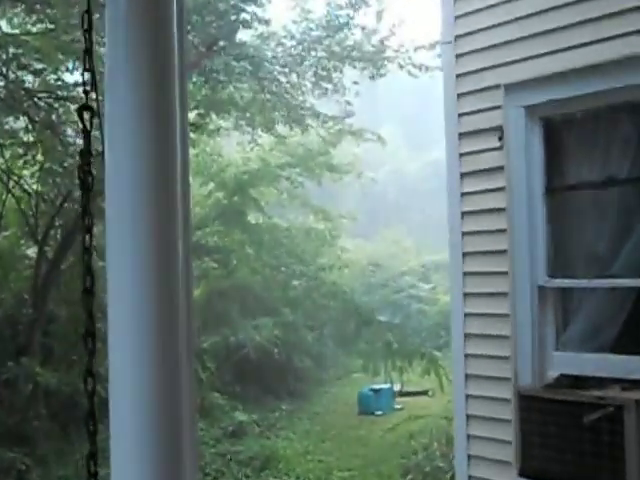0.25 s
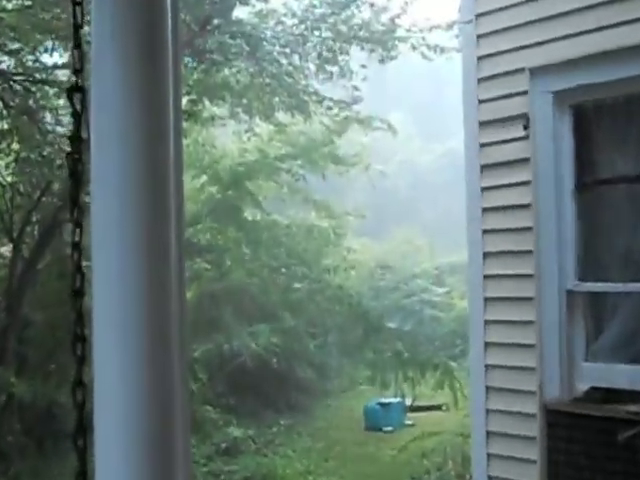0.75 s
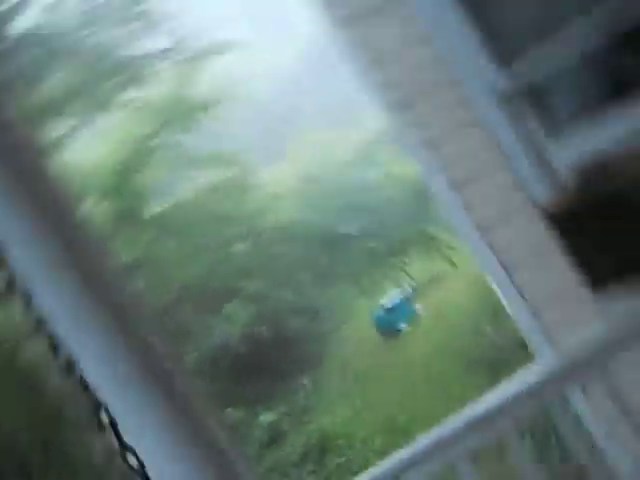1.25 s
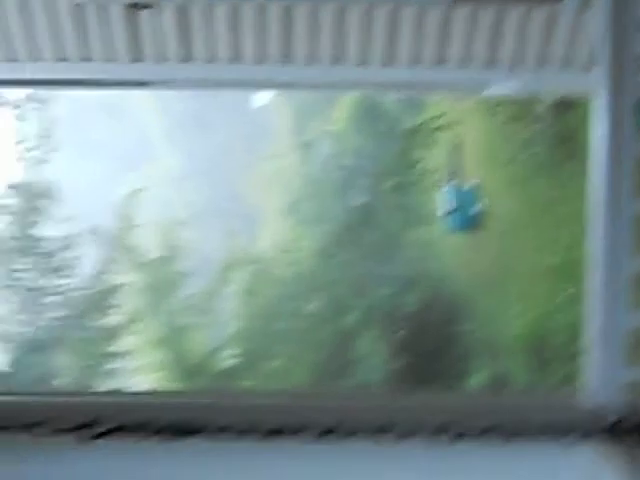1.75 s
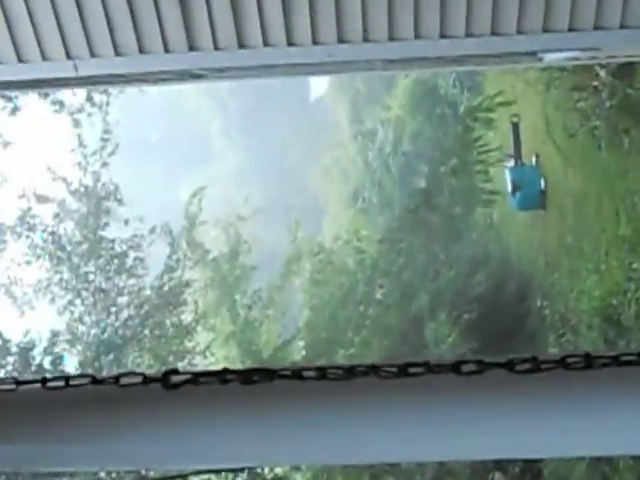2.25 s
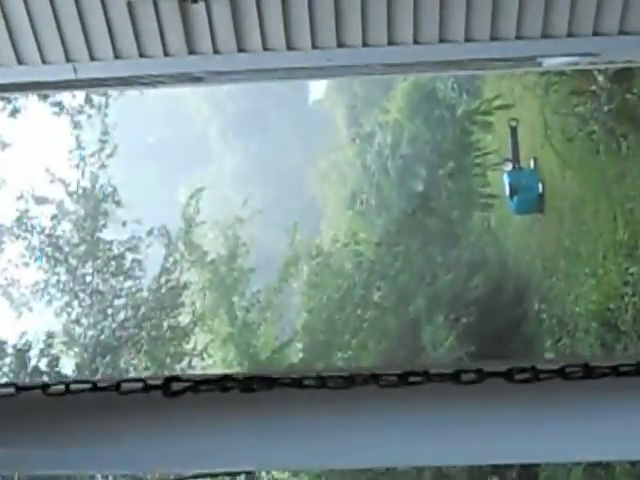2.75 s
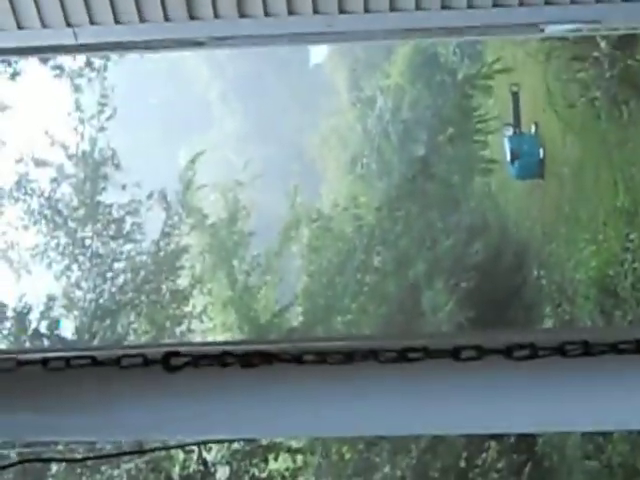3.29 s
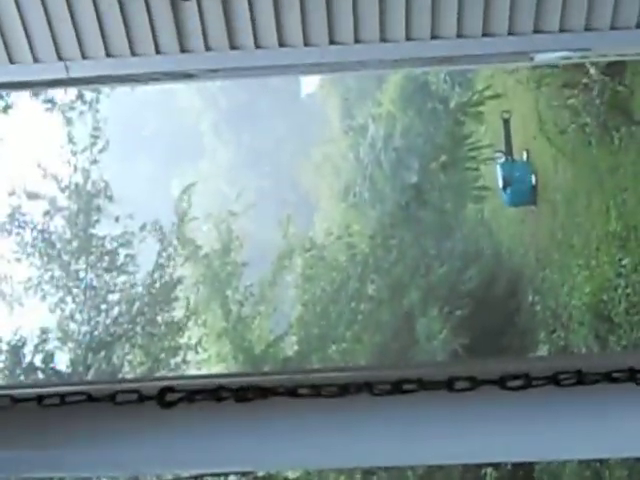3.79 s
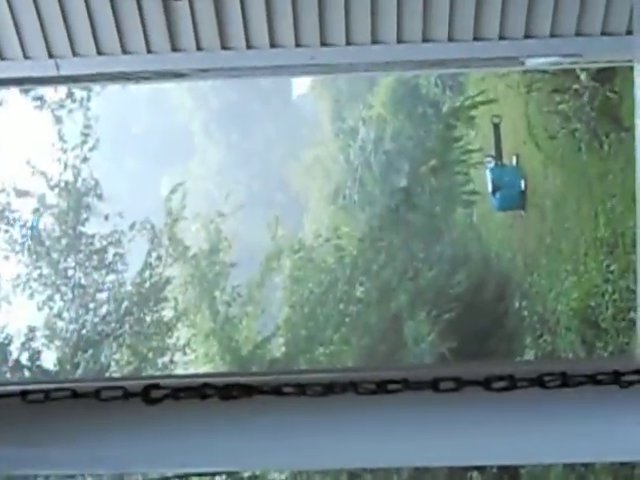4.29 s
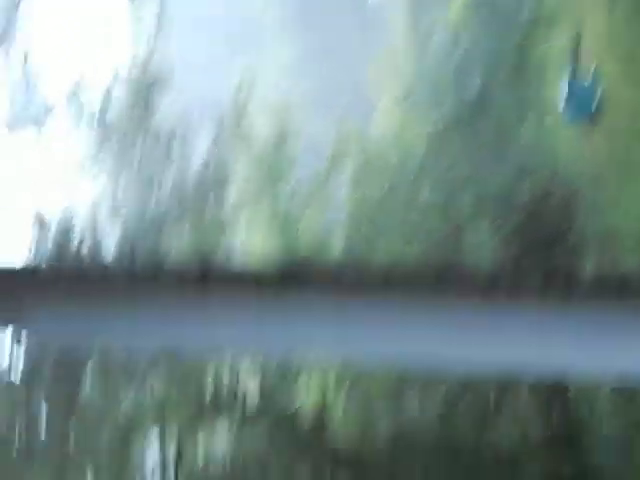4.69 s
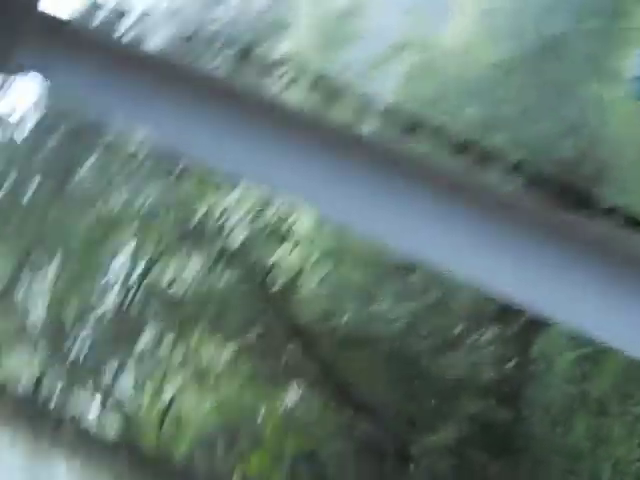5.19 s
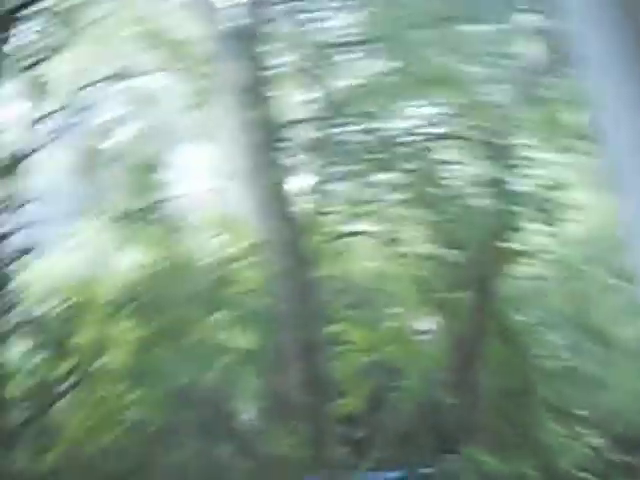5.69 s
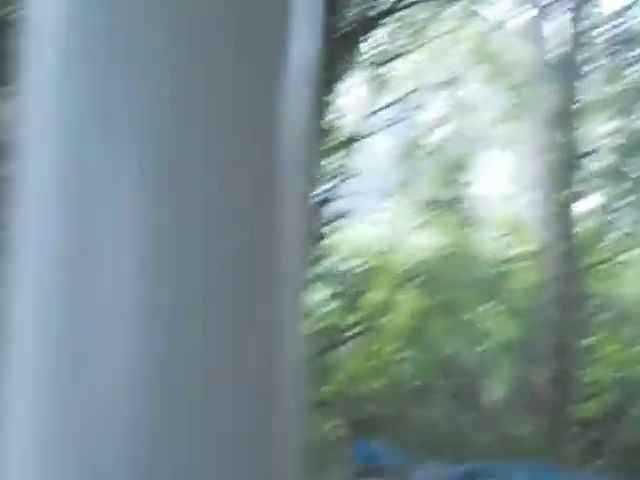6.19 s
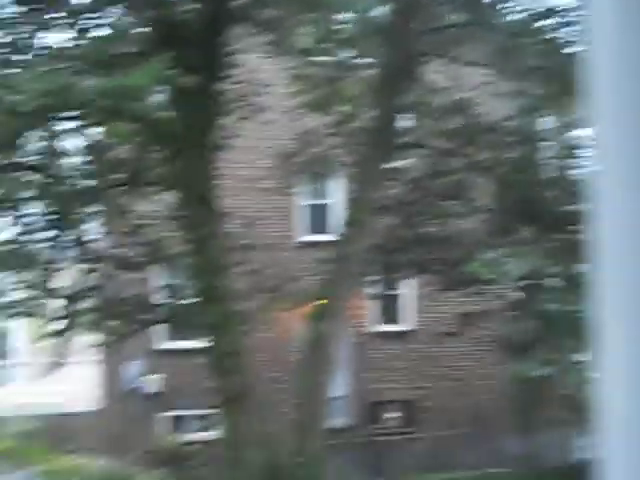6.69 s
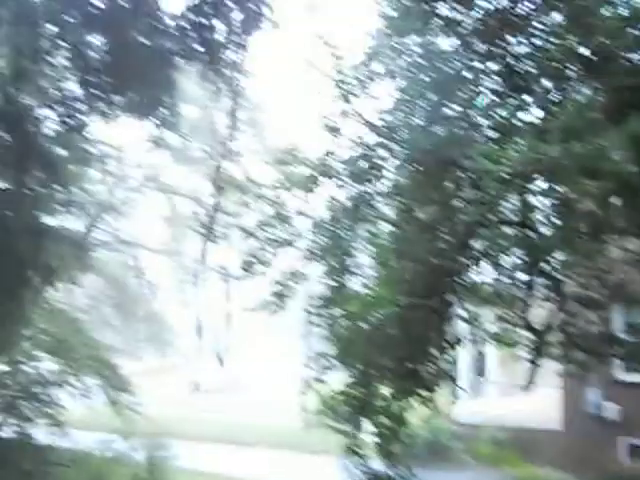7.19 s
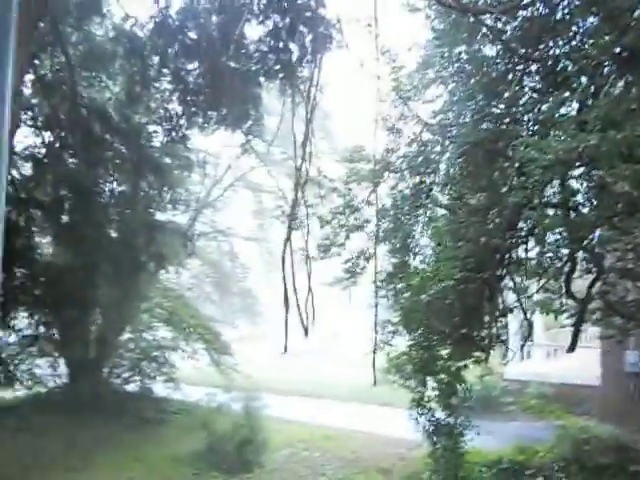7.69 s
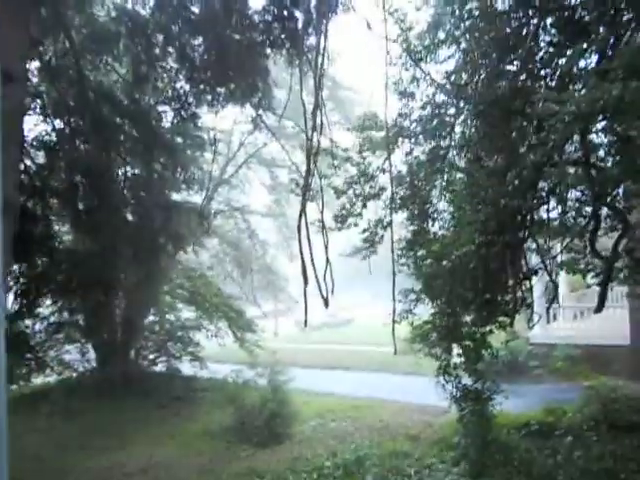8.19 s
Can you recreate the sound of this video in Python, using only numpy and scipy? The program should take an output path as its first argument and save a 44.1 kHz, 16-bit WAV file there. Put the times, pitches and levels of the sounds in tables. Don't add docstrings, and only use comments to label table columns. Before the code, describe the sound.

Heavy rain fills the whole 8.4 seconds: a dense wide hiss with drifting patches and fine patter on roof, boards, leaves and grass, captured close under a porch by a small hand-held camera with limited, slightly gritty treble. A window air conditioner hums low and faint. Individual drops plink and tick nearby, notably around 0.6, 1.35, 1.8, 2.1, 2.9 and 4.1 s; those at 2.1 and 2.9 s slightly dip the level. At 5.3 s a large drop smacks beside the microphone, a brief harsh distorted click, and everything ducks sharply, stays low until about 5.9 s, then creeps back. Distant thunder rolls in underneath, a low uneven rumble with soft deep thuds, heaviest near 7.0 s and continuing to the end. From 6.4 s the view swings streetward; hum fades, fine spray softens, and rain swells around 7.5 s, with last drips near 7.8 and 8.3 s.

```python
import sys
import numpy as np
from scipy import signal
from scipy.fft import rfft, irfft
from scipy.io import wavfile
from scipy.ndimage import uniform_filter1d

SR = 44100
rng = np.random.default_rng(int(sys.argv[2]) if len(sys.argv) > 2 else 0)


def log_audio(samples):
    frames = np.atleast_2d(samples).T
    limited = np.clip(frames, -1, 1)
    pcm = np.round(limited * 32767).astype(np.int16)
    wavfile.write(sys.argv[1], SR, pcm)


def voltage_ratio(decibels):
    exponent = np.asarray(decibels, float) / 20
    return 10 ** exponent


N = 372644


def evened(x):
    return x / np.sqrt(np.mean(x ** 2) + 1e-20)


def curves(rows, t_s):
    row_s, *columns = np.transpose(rows)
    return [np.interp(t_s, row_s, column) for column in columns]


def add(mix, start_s, sound):
    part = mix[round(start_s * SR):][:len(sound)]
    part += sound[:len(part)]


def resonate(x, hz, width_hz):
    turn = np.exp(2j * np.pi * np.cumsum(hz * np.ones(len(x))) / SR)
    pole = np.exp(-np.pi * width_hz / SR)
    return 2 * (turn * signal.lfilter([1 - pole], [1, -pole], x / turn)).real


def plink(hz, cycles, glide):
    u = np.arange(0, 1, hz * (1 + glide) / (2 * cycles * SR))
    shape = u ** 0.48 * (1 - u) ** 2.3
    turns = cycles * (2 * u + (glide - 1) * u ** 2) / (1 + glide)
    return shape / shape.max() * np.sin(2 * np.pi * turns)


def rain():
    wash_db, patter_db, drops_per_s = -18, -31.5, 700
    kinds = 40
    hit_db = 3.9 * np.minimum(rng.exponential(1, N), 3.3)
    hit = voltage_ratio(hit_db) * (rng.random(N) < drops_per_s / SR)
    kind = rng.integers(0, kinds, N)
    patter = np.zeros(N)
    for k, (a, b, c) in enumerate(rng.random((kinds, 3))):
        drop = plink(1500 + 9500 * (k + a) / kinds, 2 + 5 * b, 1.08 + 0.17 * c)
        patter += signal.oaconvolve(hit * (kind == k), drop / np.linalg.norm(drop))[:N]
    both = voltage_ratio(wash_db) * rng.standard_normal(N) + voltage_ratio(patter_db) * evened(patter)

    hz, t_s, z = signal.stft(both, SR, nperseg=1024, noverlap=768)
    patches = rng.standard_normal(z.shape[::-1]).T
    patches = uniform_filter1d(patches, size=24, axis=0)
    patches = evened(uniform_filter1d(patches, size=7, axis=1))
    gusts = evened(uniform_filter1d(rng.standard_normal(len(t_s)), size=6))
    bright = np.clip(hz / 3000, .15, 1)[:, None]
    z = z * voltage_ratio(rain_db(hz, t_s) + 5.5 + bright * (0.48 * patches + 0.38 * gusts))
    return signal.istft(z, nperseg=1024, noverlap=768)[1][:N]


def rain_db(hz, t_s):
    # (time [s], level [dB])
    downpour = [(0, 0), (.6, 0.2), (1.15, 0), (1.5, 0.9), (2.1, -1), (2.7, -1), (3.3, 1.4), (3.6, 0.4),
                (4.2, 0.6), (4.8, 0), (5.3, 0.8), (5.8, 0.8), (6.1, -2.3), (6.65, -1.5), (7.1, .5),
                (7.5, 2.5), (8, 1.8), (8.45, 1)]
    # (frequency [Hz], density [dB per Hz])
    wash = [(15, -27), (30, -4), (85, -14), (150, -4.5), (210, -8), (245, -3.5), (450, -4), (630, -2),
            (1230, 0.5), (1500, -1.5), (1910, -4), (3000, -2.5), (5200, -1.5), (7500, -4.5), (10000, -8.5)]
    # (centre [Hz], level [dB], share of strength [dB/dB], gain facing the open yard [dB])
    surfaces = [
        (300, 0, 1.13, 1.5),
        (1100, .5, 1.02, -.5),
        (3740, -1.13, 0.87, 0.7),
        (8200, 0.8, 0.89, -2.5),
    ]
    turn_from_s, turn_to_s = 6.4, 6.8

    wash_hz, wash_db = np.transpose(wash)
    place = np.log(hz + 1)
    centres_hz, own_db, follows, yard_db = np.transpose(surfaces)[:, :, None]
    facing = np.clip((t_s - turn_from_s) / (turn_to_s - turn_from_s), 0, 1)
    log_centres = np.log(centres_hz[:, 0])
    share = np.array([np.interp(place, log_centres, one) for one in np.eye(len(log_centres))])
    surface_db = own_db + follows * curves(downpour, t_s)[0] + yard_db * facing
    return np.interp(place, np.log(wash_hz), wash_db)[:, None] + share.T @ surface_db


def drips():
    # (time [s], peak [dB], pitch [Hz], length [cycles])
    near_drops = [(.627, -6, 4600, 4), (0.643, -10, 3000, 5), (.662, -14, 3000, 6), (1.346, -13, 3050, 10),
                  (1.355, -17, 2950, 12), (1.656, -10, 9800, 5), (1.8008, -8, 3500, 5.4),
                  (1.856, -14, 3900, 4.6), (2.1405, -7, 6000, 7), (2.911, -16, 1150, 2.8),
                  (2.923, -12, 1250, 3.7), (2.9233, -10, 3900, 3), (3.2205, -7.5, 3900, 5.6),
                  (3.2368, -11, 3700, 5), (3.448, -7.5, 4000, 5), (4.1062, -11, 1900, 4),
                  (4.143, -4, 6000, 3), (4.1505, -10, 4000, 5), (5.292, -10, 2800, 9.9),
                  (5.5362, -3, 10000, 8), (5.5362, -6, 4800, 4), (5.744, -2, 7300, 5),
                  (6.4833, -8, 3600, 4), (6.9295, -13, 4400, 7), (6.961, -12, 4600, 16),
                  (7.0928, -6, 3300, 3.4), (7.7585, -6, 3400, 4), (7.763, -6, 5600, 4),
                  (7.977, -7, 3550, 5), (8.2716, -2, 3600, 4)]
    # (time [s], peak [dB], pitch [Hz], length [cycles], end pitch [factor])
    smack = [
        (5.2990, 1, 5900, 9, .7),
        (5.2990, 2, 9200, 14, .95),
        (5.2990, -1, 6800, 7, 1.1),
        (5.2998, 0, 7700, 13, .95),
        (5.3001, 4, 4400, 12, .5),
    ]
    rebound_s, rebound_db, rebound_pitch = 0.0032, -2.5, 1.1

    falls = [(*row, 0.96) for row in near_drops]
    rebounds = [(s + rebound_s, db + rebound_db, hz * rebound_pitch, cycles, 1)
                for s, db, hz, cycles in near_drops]
    drops = [*smack, *falls, *rebounds]
    splash = rng.standard_normal((len(drops), 400)) * voltage_ratio(-12 - 40 * np.arange(400) / 400)
    out = np.zeros(N)
    for (s, db, hz, cycles, glide), spray in zip(drops, splash):
        add(out, s, voltage_ratio(db) * plink(hz, cycles, glide))
        add(out, s, voltage_ratio(db) * spray)
    return out


def thunder():
    # (time [s], peak [dB], pitch [Hz])
    thuds = [
        (6.31, -39, 30),
        (6.73, -32, 42),
        (6.96, -25, 36),
        (7.42, -35, 30),
        (7.88, -36, 40),
        (8.13, -34, 45),
    ]

    roll_gain, roll_hz, bed_gain = rolls()
    shocks = rng.standard_normal((2, N)) * (rng.random((2, N)) < 900 / SR)
    roll = resonate(resonate(shocks[0], roll_hz, 36), roll_hz, 36) + 0.4 * resonate(shocks[0], 148, 40)
    roll = roll / np.sqrt(uniform_filter1d(roll ** 2, size=5000) + 1e-12)
    bed = resonate(resonate(shocks[1], 38, 45), 38, 45)
    out = voltage_ratio(5.0) * (roll_gain * evened(roll) + bed_gain * evened(bed))
    for s, db, hz in thuds:
        add(out, s, voltage_ratio(db) * plink(hz, cycles=1.8, glide=0.99))
    return out


def rolls():
    # (crest time [s], level [dB], centre [Hz])
    crests = [(5.45, -40, 103), (6.15, -42, 105), (6.5, -40, 105), (6.79, -38.5, 111), (7.0, -39, 102),
              (7.18, -38.5, 86), (7.32, -40, 102), (7.59, -38, 89), (7.75, -41, 95), (7.9, -37, 100),
              (8.04, -37.5, 104), (8.4, -42, 101)]
    swell_db_per_s, die_db_per_s = 75, 55
    bed_from_s, bed_rise_s, bed_db = 5.6, .55, -50

    t_s = np.arange(0, N / SR + .01, .005)
    crest_s, db, hz = np.transpose(crests)[:, :, None]
    swell_db = swell_db_per_s * np.minimum(t_s - crest_s, 0)
    die_db = die_db_per_s * np.maximum(t_s - crest_s, 0)
    power = voltage_ratio(db + swell_db - die_db) ** 2
    total = power.sum(0)
    bed = voltage_ratio(bed_db) * np.clip((t_s - bed_from_s) / bed_rise_s, 0, 1)
    slow = [t_s, np.sqrt(total), (power * hz).sum(0) / total, bed]
    return curves(np.transpose(slow), np.arange(N) / SR)


def hum():
    # (time [s], level [dB])
    hum_level = [(0, -43.5), (1, -46), (2, -44), (3, -48.5), (4, -42), (5, -48.5), (6, -43), (7, -60),
                 (8.45, -53)]
    line_hz = 57.6
    t_s = np.arange(N) / SR
    noise = rng.standard_normal((2, N))
    line = np.sqrt(2) * np.sin(2 * np.pi * line_hz * t_s) + 0.16 * evened(resonate(noise[0], line_hz, 3.1))
    fourth = evened(resonate(noise[1], 236, 9.4))
    return voltage_ratio(curves(hum_level, t_s)[0]) * line + voltage_ratio(-54.0) * fourth


def scene():
    return (rain() + drips() + hum() + thunder())[None]


def gain_control():
    # (time [s], drop [dB])
    ducks = [
        (2.142, 2.5),
        (2.925, 2.44),
        (5.297, 13),
        (6.975, 1.4),
        (7.766, 0.95),
        (8.273, 0.5),
    ]
    hold_s, recover_s, attack_s = 0.56, 0.48, 0.0084
    t_s, gain = np.arange(N) / SR, np.ones(N)
    for s, db in ducks:
        at = round(s * SR)
        creeping_s = np.maximum(t_s[at:] - s - hold_s, 0)
        gain[at:] = 1 - (1 - gain[at] * voltage_ratio(-db)) * np.exp(-creeping_s / recover_s)
    pole = np.exp(-1 / (attack_s * SR))
    return 1 + signal.lfilter([1 - pole], [1, -pole], gain - 1)


def roll_off(x):
    return signal.sosfilt(signal.butter(12, 16520, fs=SR, output="sos"), x)


def record(dry):
    hz = np.fft.rfftfreq(N, 1 / SR)
    before = 1 / np.sqrt(1 + (hz / 10450) ** 60)
    sampled = np.clip(irfft(rfft(dry * gain_control()) * before, N), -.66, .66)
    halved = sampled * (1 + (-1.) ** np.arange(N))
    after = voltage_ratio(-6 * np.maximum((hz - 10000) / 1000, 0) ** 2) * (hz < 12390)
    smooth = np.clip(irfft(rfft(halved) * after, N), -.73, .73)
    return roll_off(smooth)


dry = scene()
out = record(dry)
log_audio(out)
```